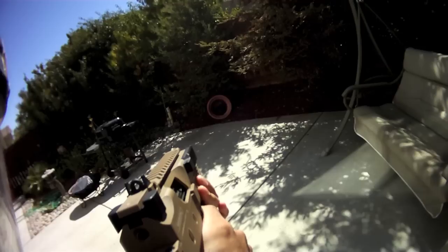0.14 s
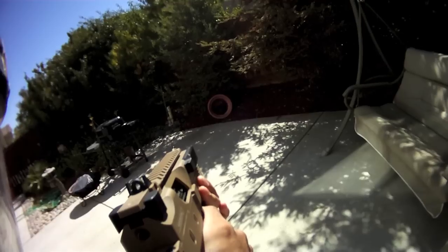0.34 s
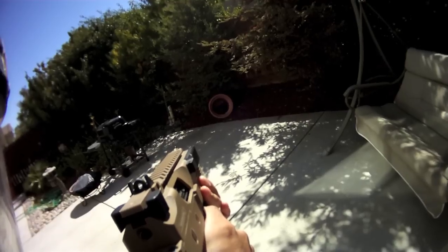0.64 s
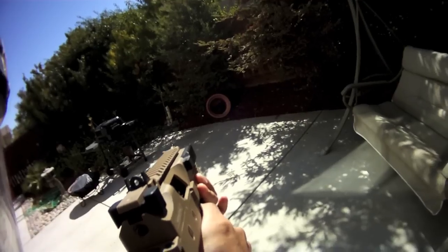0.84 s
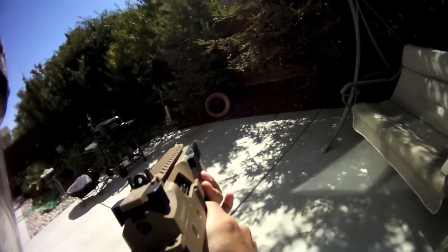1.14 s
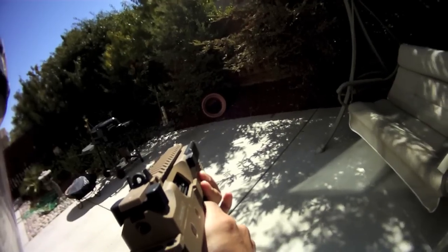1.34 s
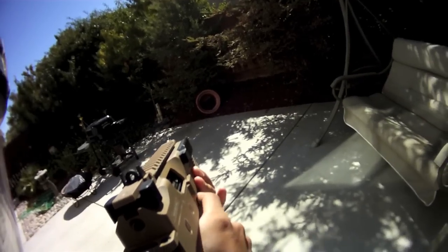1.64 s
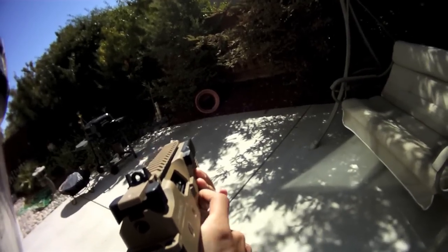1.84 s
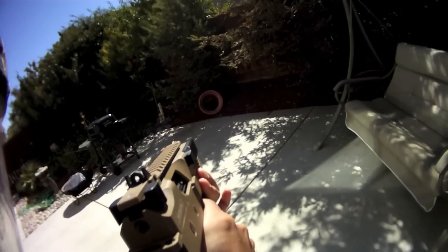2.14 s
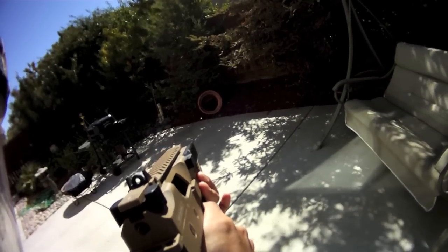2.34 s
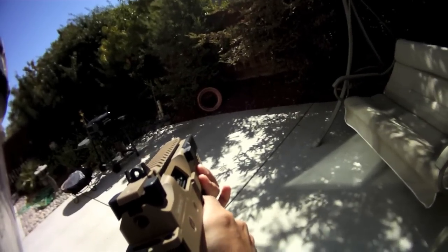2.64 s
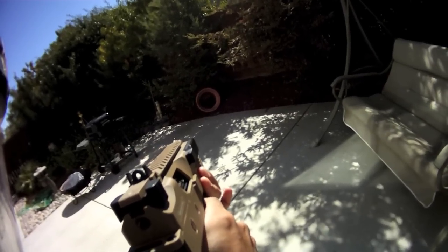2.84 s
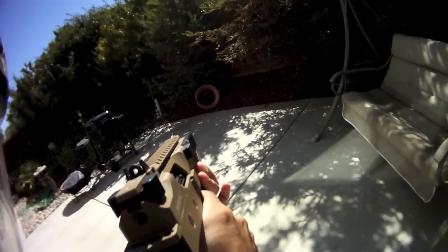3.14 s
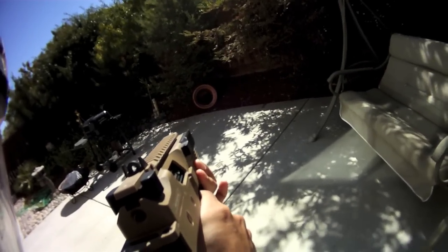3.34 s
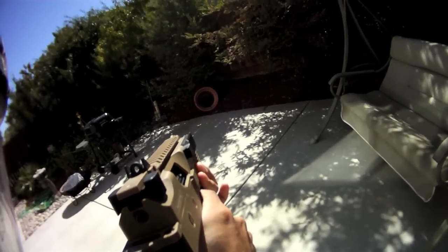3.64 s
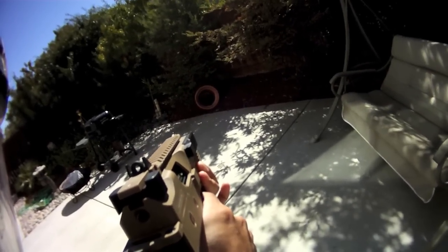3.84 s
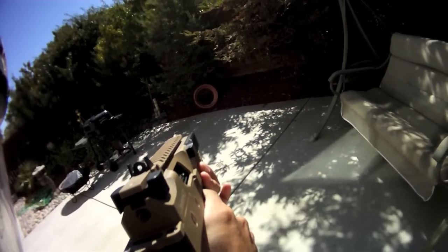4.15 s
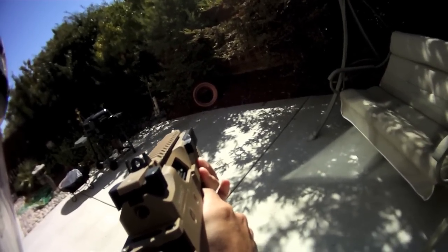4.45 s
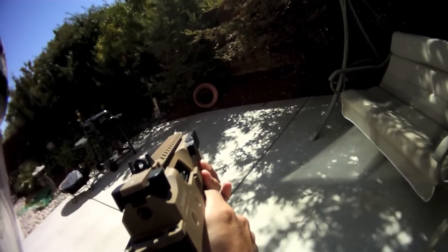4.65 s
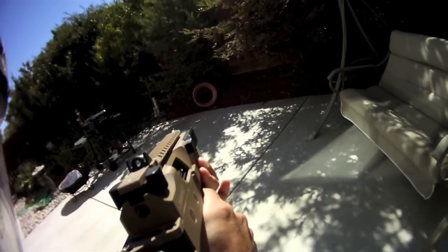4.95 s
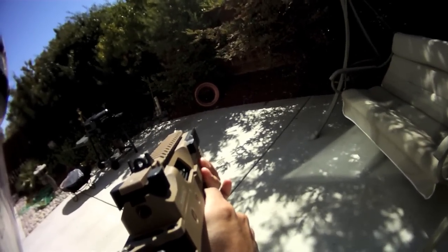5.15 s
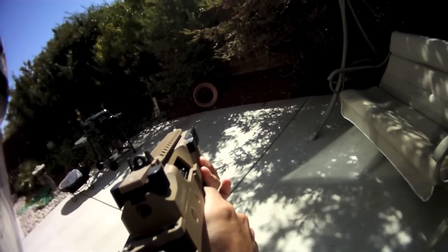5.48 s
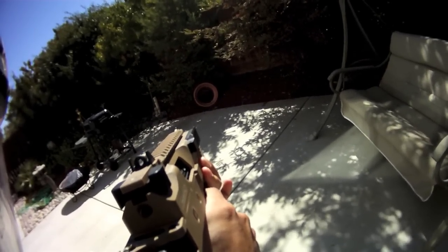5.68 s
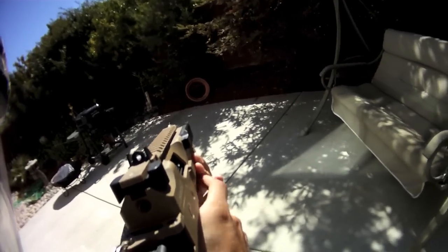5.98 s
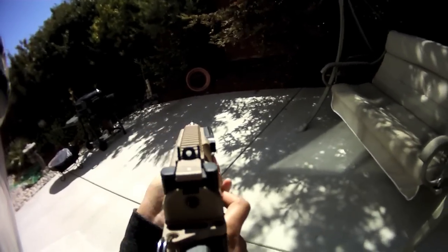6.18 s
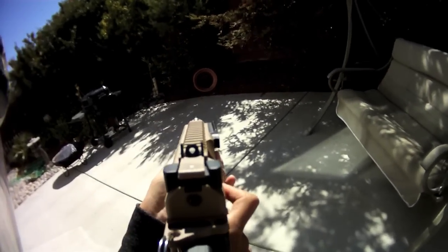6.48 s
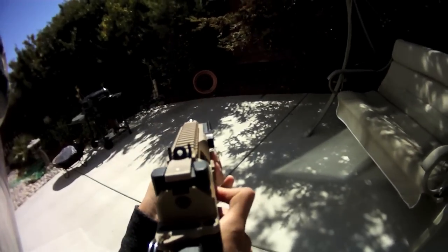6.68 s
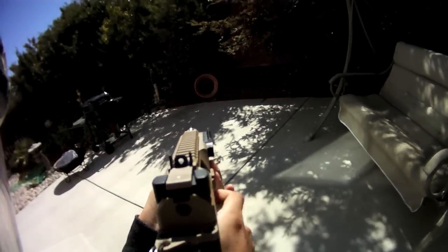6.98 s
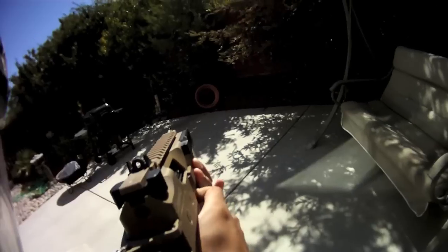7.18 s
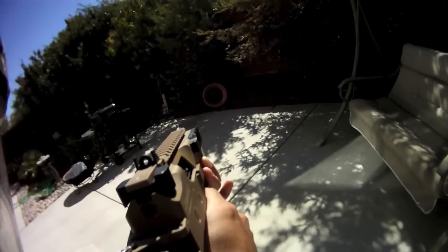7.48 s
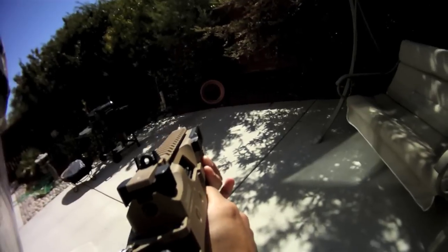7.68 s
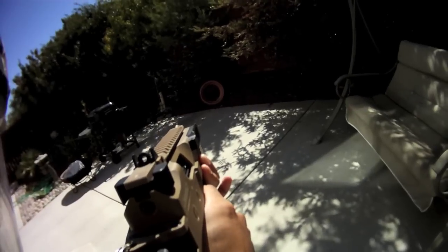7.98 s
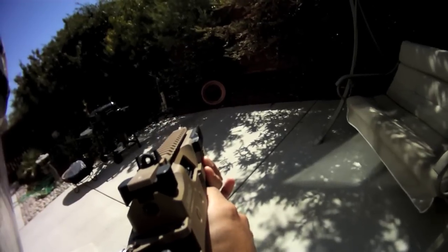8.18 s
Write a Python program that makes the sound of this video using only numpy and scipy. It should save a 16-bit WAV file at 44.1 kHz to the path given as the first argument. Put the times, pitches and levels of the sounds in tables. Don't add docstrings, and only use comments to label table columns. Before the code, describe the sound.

In a walled backyard, quick bursts of harsh mechanical cracks come from a gas-driven replica gun held near the microphone, which flattens the peaks. Steel rings briefly after each burst and the walls answer faintly. Small bright trigger clicks and distant pellet taps come between bursts. After the eighth burst there is a pause, one sharp switch snap, light finger ticks, a soft stock knock, then quiet outdoor air with a very faint whine.

```python
import sys
import numpy as np
from scipy import signal
from scipy.fft import rfft, irfft
from scipy.io import wavfile
from scipy.ndimage import uniform_filter1d

SR = 44100
rng = np.random.default_rng(int(sys.argv[2]) if len(sys.argv) > 2 else 0)


def wrap_up_sound(samples):
    columns = np.atleast_2d(samples).T
    tamed = np.clip(columns, -1, 1)
    steps = np.round(tamed * 32767).astype(np.int16)
    wavfile.write(sys.argv[1], SR, steps)


def invert_db(x):
    u = np.asarray(x, float) / 20
    return 10 ** u


N = 366912


def rms_one(x):
    return x / np.sqrt(np.mean(x ** 2) + 1e-20)


def at_hz(points, hz, axis=1):
    table = np.array(points)
    return np.interp(np.log(np.maximum(hz, 1)), np.log(table[:, 0]), table[:, axis])


def convolve(x, response):
    return signal.oaconvolve(x, response)[:len(x)]


def high_pass(x, hz):
    return signal.sosfilt(signal.butter(2, hz, "high", fs=SR, output="sos"), x)


def colour(x, spectrum, size=8192):
    log_gain = np.log(invert_db(at_hz(spectrum, np.fft.rfftfreq(size, 1 / SR))))
    cepstrum = irfft(log_gain, size)
    cepstrum[1:size // 2] *= 2
    cepstrum[size // 2 + 1:] = 0
    response = irfft(np.exp(rfft(cepstrum)), size)
    return convolve(x, response / np.sqrt(np.sum(response ** 2)))


def clicks(seconds, db):
    out = np.zeros(N)
    np.add.at(out, np.round(np.asarray(seconds) * SR).astype(int), invert_db(db))
    return out


def fade(rise_ms, t60_ms):
    ms = np.arange(int(SR * .12)) * 1000 / SR
    return (1 - np.exp(-ms / rise_ms)) * invert_db(-60 * ms / t60_ms)


def ring(x, hz, t60_s):
    radius = invert_db(-60 / (t60_s * SR))
    angle = 2 * np.pi * hz / SR
    return signal.lfilter([0, np.sin(angle)], [1, -2 * radius * np.cos(angle), radius ** 2], x + 1e-18)


def puff(hz, width_ms):
    ms = np.arange(-4 * width_ms, 4 * width_ms, 1000 / SR)
    return np.cos(2 * np.pi * hz * ms / 1000) * np.exp(-.5 * (ms / width_ms) ** 2)


# (frequency [Hz], density [dB per Hz])
AIR_SPECTRUM = [(12, -40.5), (20, -8.5), (64, -3.5), (253, -7), (506, 0), (950, -9), (1240, -39.5),
                (2090, -120)]
# (time [s], level [dB])
AIR_SWELL = [(0.7, 0), (1.3, 2.5), (2.2, 1.5), (6.1, 0.0)]
# (frequency [Hz], density [dB per Hz])
HISS_SPECTRUM = [(590, -30), (1000, -1.5), (3000, -5), (10300, -10.5), (15000, -13.5), (15400, -40.0)]
# (time [s], level [dB])
HUM_GUSTS = [
    (1.2, -72),
    (1.3, -73.5),
    (1.5, -73),
    (1.6, -73),
    (1.76, -71),
]
# (frequency [Hz], level [dB rms])
WHINE = [(11090, -82)]
AIR_DB, HISS_DB = -70.5, -70
HUM_HZ, HUM_WIDTH_S = 110, 0.049


def background():
    t = np.arange(N) / SR
    air_gain = invert_db(AIR_DB + np.interp(t, *np.transpose(AIR_SWELL)))
    air = air_gain * colour(rng.standard_normal(N), AIR_SPECTRUM, size=32768)
    hiss = invert_db(HISS_DB) * colour(rng.standard_normal(N), HISS_SPECTRUM)
    gusts = sum(invert_db(db) * np.exp(-.5 * ((t - s) / HUM_WIDTH_S) ** 2) for s, db in HUM_GUSTS)
    hum = gusts * np.sin(2 * np.pi * HUM_HZ * t)
    whine = sum(invert_db(db) * np.sin(2 * np.pi * hz * t) for hz, db in WHINE)
    return air + hiss + np.sqrt(2) * (hum + whine)


# (frequency [Hz], density [dB per Hz])
YARD_SPECTRUM = [(59, -54.0), (100, -24.5), (185, -15), (424, -11.5), (1030, -19), (1450, -15.5),
                 (1750, -13.5), (2100, -12), (3120, -1.5), (4000, -9), (4650, -19.0), (5500, -16),
                 (12100, -22.5), (15000, -36)]
# (frequency [Hz], early t60 [s], late t60 [s])
YARD_T60 = [(200, 0.32, 0.72), (430, 0.29, 0.99), (1000, 0.2, 0.54), (1890, 0.29, .8), (3100, 0.3, .7),
            (4200, 0.25, 0.76), (6000, .25, 0.5), (13000, 0.23, .4)]


def yard(x):
    t = np.arange(SR) / SR
    edges_hz = 100 * 2 ** np.arange(0, 7.6, .5)
    white = rng.standard_normal((2, SR))
    white *= invert_db(3.6 * rng.standard_normal(SR // 100 + 1)).repeat(100)[:SR]
    response = np.zeros(SR)
    for k, (low, high) in enumerate(zip(edges_hz, edges_hz[1:])):
        band_pass = signal.butter(2, [low, high], "band", fs=SR, output="sos")
        band = signal.sosfilt(band_pass, white[k % 2])
        hz = np.sqrt(low * high)
        early_s, late_s = at_hz(YARD_T60, hz), at_hz(YARD_T60, hz, axis=2)
        response += band * (invert_db(-60 * t / early_s) + invert_db(-16.0 - 60 * t / late_s))
    build_up = 1 - np.exp(-(t / 0.022) ** 2)
    return convolve(x, colour(response * build_up, YARD_SPECTRUM))


# (time [s], level [dB], frequency [Hz])
BUMPS = [
    (0.491, -59, 83.33),
    (1.641, -59, 45.12),
    (2.53, -53, 45),
    (6.248, -58, 60),
    (6.937, -52.5, 75.6),
    (6.955, -62.5, 160),
    (6.992, -55, 69.8),
    (7.125, -46.5, 290),
    (7.13, -49.5, 143),
    (7.355, -55.0, 80),
]


def mount_bumps():
    out = np.zeros(N)
    for when, db, hz in BUMPS:
        out -= convolve(clicks([when - 1.1 / hz], db), puff(hz, 300 / hz))
    return out


def palm_slide(noise):
    drags = convolve(clicks([6.96, 7.03, 7.065], -73.0), fade(15.0, 300))
    return ring(drags * noise, 2600, 0.0018)


# (time [s], bright level [dB], dull level [dB], dull pitch [Hz])
TICKS = [(0.0664, -47, -48, 2900), (0.3873, -43, -36, 3530), (2.2508, -34.5, -55, 2200),
         (2.7999, -36, -56, 2220), (3.5044, -36.5, -50, 2400), (3.9752, -33.5, -47.5, 3700),
         (3.989, -48, -64, 3100), (4.5375, -37, -48.5, 2400), (5.0614, -37, -48.0, 2520),
         (5.686, -35, -45, 2600), (6.6296, -52, -50.5, 1600), (6.99, -64.5, -54, 2600),
         (7.01, -46, -41.5, 2340), (7.03, -66.0, -55, 2400), (7.075, -66.0, -57.0, 2300),
         (7.2174, -64.5, -42.5, 1440), (7.4275, -64, -46, 3800)]
# (frequency [Hz], level [dB], t60 [s])
TRIGGER_MODES = [(3200, -8, .005), (5500, 0, .005), (6140, -2.5, .005), (7100, -1, .005),
                 (9040, -9.5, 0.0025), (11600, -11.5, .004)]


def trigger_ticks(noise):
    s, bright_db, dull_db, dull_hz = np.transpose(TICKS)
    scratch = convolve(clicks(s, bright_db), fade(.3, 14.0)) * noise
    out = sum(invert_db(db - 16.0) * ring(scratch, hz, t60_s) for hz, db, t60_s in TRIGGER_MODES)
    for when, db, hz in zip(s, dull_db, dull_hz):
        scratch = convolve(clicks([when], db), fade(0.41, 9.8)) * noise
        out += invert_db(-11.5) * ring(scratch, hz, 0.0037)
        out += invert_db(-18.0) * ring(scratch, hz * 2.3, .004)
        out += invert_db(-22.0) * ring(scratch, hz * 2.5, .004)
    return out


# (time [s], peak level [dB])
STRIKES = [
    (0.9004, -19),
    (0.9111, -24),
    (2.461, -15),
    (2.583, -29),
    (3.0982, -14),
    (3.107, -15),
    (3.6554, -2),
    (3.684, -7.5),
    (4.6852, -29),
    (4.6947, -30),
]


def pellet_strikes(noise):
    hits = convolve(clicks(*np.transpose(STRIKES)), fade(0.67, 12.0))
    return invert_db(-17.0) * ring(hits * noise, 3050, .006)


# (time [s], level [dB])
SNAP = [
    (6.6014, -12.5),
]
# (frequency [Hz], level [dB], t60 [s])
SNAP_MODES = [(625, -5.5, 0.023), (780, -23, 0.096), (915, -9, 0.0064), (1870, -4, 0.013),
              (1800, -26.5, 0.12), (2900, -9, 0.0097), (3700, -0.5, 0.0099), (3800, -30, 0.1),
              (5900, -8.5, 0.01), (7050, -7.5, 0.0074)]
# (time [s], level [dB])
KNOCK = [
    (7.12, -31.5),
]
# (frequency [Hz], level [dB], t60 [s])
KNOCK_MODES = [(425, 0, 0.091), (600, -2.5, 0.09), (1100, -7.5, 0.074), (1330, -9, 0.055),
               (2000, -11, 0.016), (2530, -8, 0.0244), (3100, -14, .015)]


def snap_and_knock(noise):
    out = np.zeros(N)
    for hits, modes, crack_db, damping in ((SNAP, SNAP_MODES, -7.0, 1), (KNOCK, KNOCK_MODES, -21.0, .6)):
        blow = clicks(*np.transpose(hits))
        for k, (hz, db, t60_s) in enumerate(modes):
            out += invert_db(db - 8.0) * (-1) ** k * ring(blow, hz, damping * t60_s)
        out += invert_db(crack_db) * convolve(blow, fade(.1, 9.0)) * noise
        near_walls = convolve(blow, fade(1.9, 210)) * noise
        out += invert_db(crack_db - 29.5) * colour(near_walls, HISS_SPECTRUM)
    return out


def small_sounds():
    noise = high_pass(rng.standard_normal(N), 700)
    contacts = trigger_ticks(noise) + pellet_strikes(noise) + snap_and_knock(noise) + palm_slide(noise)
    return high_pass(high_pass(contacts, 400), 380) + mount_bumps()


# (muzzle pop [s], squeal start [Hz], bolt home after pop [ms], latch level [dB])
SHOTS = [(0.7194, 3504, 30.9, -11.5), (0.7655, 3463, 28.0, -19), (0.8099, 3565, 28.1, -16.5),
         (0.8545, 2980, 29.0, -13), (2.3088, 3353, 31.8, -16), (2.3608, 3006, 28.9, -11.5),
         (2.4059, 3227, 28.6, -10), (2.9483, 3310, 32.2, -16.5), (2.9957, 3070, 28.3, -13),
         (3.0399, 3930, 28.9, -17), (3.5483, 3650, 32.2, -19), (3.5992, 3156, 30.7, -10),
         (4.0159, 3370, 32.0, -24.5), (4.0649, 3320, 28.2, -18), (4.5806, 3380, 29.2, -19),
         (4.6262, 2988, 29.2, -17.5), (5.097, 3150, 31.4, -13), (5.1424, 3220, 29.3, -17.5),
         (5.1874, 3220, 29.7, -13.5), (5.7243, 3000, 30.5, -17.5), (5.7705, 3490, 32.4, -14),
         (5.8175, 3126, 29.1, -22)]
BURST_GAP_S = .2
VALVE_LEAD_MS, LEAD_GROWTH_MS = 6.8, .25
SQUEAL_MS, SQUEAL_GROWTH_MS = 3.1, 0.51
SQUEAL_REST_HZ, SQUEAL_KEEPS = 3033, 0.22
STOP_MS, STIFF_MS = 3.5, 1.5
WARM_FROM_S = 4.3
LATCH_BEFORE_HOME_MS = 7.2


def cycle():
    pop, start_hz, home_ms, _ = np.transpose(SHOTS)
    first = np.diff(pop, prepend=0) > BURST_GAP_S
    count = np.arange(len(pop))
    place = count - np.maximum.accumulate(count * first)
    lead_ms = VALVE_LEAD_MS + LEAD_GROWTH_MS * place
    squeal_ms = SQUEAL_MS + SQUEAL_GROWTH_MS * place
    end_hz = SQUEAL_REST_HZ + SQUEAL_KEEPS * (start_hz - SQUEAL_REST_HZ)
    stop_ms = STOP_MS + STIFF_MS * first * (pop < WARM_FROM_S)
    home = pop + home_ms / 1000
    latch = home - LATCH_BEFORE_HOME_MS / 1000
    return pop, lead_ms, squeal_ms, start_hz, end_hz, stop_ms, latch, home


# (frequency [Hz], level [dB], t60 [s])
BARREL_MODES = [(2620, -3, 0.25), (2767, -12.5, 0.18), (2700, -1, 0.13), (2950, -4, 0.53),
                (3110, -2.5, 0.88), (3200, -4, 0.61), (3750, -13, 0.39)]


def barrel(level_db=-47.5, detune=0.039):
    out = np.zeros(N)
    chance = rng.standard_normal((len(SHOTS), 2, len(BARREL_MODES)))
    t = np.arange(SR) / SR
    for home, (strength, shift) in zip(cycle()[-1], chance):
        at = round(home * SR)
        for (hz, db, t60_s), a, b in zip(BARREL_MODES, strength, shift):
            decay = invert_db(level_db + db + 3.4 * a - 60 * t / (0.95 * t60_s))
            out[at:at + SR] += decay * np.sin(2 * np.pi * hz * (1 + detune * b) * t)
    return out


# (frequency [Hz], density [dB per Hz])
METAL_SPECTRUM = [(88, -42.5), (150, -14.5), (589, -12), (1140, -17), (2450, -1), (2760, -9), (3040, -3.5),
                  (4160, -2), (4670, -14), (5050, -5), (10200, -15), (12900, -16.5), (16000, -35.5)]
HOME_DB, LAST_HOME_DB = -13, -13


def rattle(grain_db=4.0):
    pop, lead_ms, *_, stop_ms, latch, home = cycle()
    valve = pop - lead_ms / 1000
    stop = pop + stop_ms / 1000
    latch_db = np.array(SHOTS)[:, -1]
    ends_burst = np.diff(pop, append=N) > BURST_GAP_S
    home_db = np.where(ends_burst, LAST_HOME_DB, HOME_DB)
    # (time [s], level [dB], rise [ms], t60 [ms])
    contacts = [(valve - .011, -41.0, 8.0, 200),
                (valve - .0035, -19.0, 1.2, 40),
                (valve, -5.0, .3, 22),
                (pop - .0012, -14.0, .3, 30),
                (pop + .0009, -14.0, .3, 8),
                (stop + 0.0011, -6.0, .15, 8),
                (stop, -7.0, .2, 17),
                (stop + 0.0039, -16.0, .5, 26),
                (pop + 0.011, -29.0, 6.0, 200),
                (latch, latch_db, .6, 22),
                (home, home_db, .3, 50)]
    shake = sum(convolve(clicks(s, db), fade(rise_ms, t60_ms)) for s, db, rise_ms, t60_ms in contacts)
    grains = rms_one(rng.standard_normal(N) * invert_db(grain_db * rng.standard_normal(N)))
    return colour(shake * grains, METAL_SPECTRUM)


def squeal(level_db=0.0, wander=.09, flutter_db=2.5, rise_ms=0.31, end_ms=0.84):
    out = np.zeros(N)
    chance = rng.standard_normal((len(SHOTS), 400))
    ms = np.arange(400) * 1000 / SR
    pops, leads_ms, lengths_ms, starts_hz, ends_hz, stops_ms, _, _ = cycle()
    for pop, lead, length, start_hz, end_hz, draw in zip(pops, leads_ms, lengths_ms, starts_hz, ends_hz, chance):
        hz = np.interp(ms, [length / 4, length * .75], [start_hz, end_hz])
        hz = hz * (1 + wander * rms_one(uniform_filter1d(draw, size=16)))
        phase = 2 * np.pi * np.cumsum(hz) / SR + 3 * draw[0]
        opening = 1 / (1 + np.exp((1.1 - ms) / rise_ms))
        closing = 1 / (1 + np.exp((ms - length - 1.2) / end_ms))
        flutter = invert_db(flutter_db * rms_one(uniform_filter1d(draw[::-1], size=30)))
        at = round((pop - (lead + 1) / 1000) * SR)
        out[at:at + 400] += invert_db(level_db) * opening * closing * flutter * np.sin(phase)
    valve = clicks(pops - (leads_ms - .3) / 1000, -3.0)
    out += ring(valve, 4050, 0.007)
    stop = clicks(pops + (stops_ms + .2) / 1000, 3.5 + 0.62 * chance[:, 1])
    out += ring(stop, 3700, 0.006)
    out += invert_db(-0.5) * ring(stop, 6600, 0.0034)
    out += invert_db(-10.0) * ring(stop, 1800, 0.015)
    return out


# (delay [ms], level [dB], sign)
POP_ECHOES = [
    (7.4, -17, 0.99),
    (9.6, -19.0, 1),
    (14.9, -19, 1),
    (22.4, -19.5, -1),
]


def muzzle():
    pops = np.array(SHOTS)[:, 0] - .0008
    low = convolve(clicks(pops - .0043, -11.5), puff(465, 1.35))
    edges = clicks(pops, -10.5) - clicks(pops - .001, -13.0) - clicks(pops + 0.00093, -13.0)
    crest = convolve(edges, puff(1700, .2))
    echoes = sum(sign * invert_db(db) * np.roll(low, round(ms * SR / 1000)) for ms, db, sign in POP_ECHOES)
    return low + crest + echoes


def scene():
    gun = high_pass(squeal() + muzzle() + rattle() + barrel(), 150)
    blows = clicks(np.array(SHOTS)[:, 0] - .005, -52.0) + clicks(cycle()[-1], -56.5)
    blows = convolve(blows, fade(1.5, 110)) * rng.standard_normal(N)
    return (gun + small_sounds() + yard(blows) + background())[None]


def band_limit(x):
    return signal.sosfilt(signal.butter(12, 16460, fs=SR, output="sos"), x)


OVERLOAD, CUTOFF_HZ = .61, 16700


def record(dry):
    flat = dry / (1 + np.abs(dry / OVERLOAD) ** 6) ** (1 / 6)
    flat = dry + high_pass(flat - dry, 70)
    low_pass = signal.cheby2(10, 60, CUTOFF_HZ, fs=SR, output="sos")
    return band_limit(signal.sosfilt(low_pass, flat))


dry = scene()
out = record(dry)
wrap_up_sound(out)
```